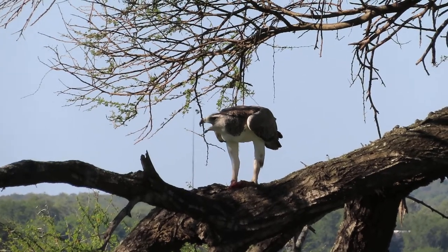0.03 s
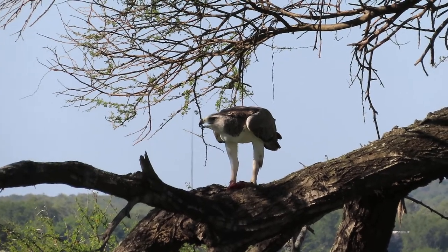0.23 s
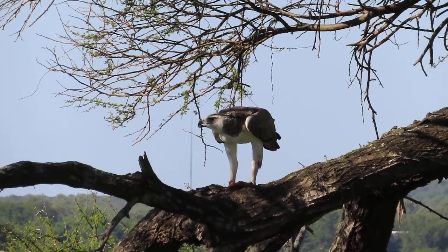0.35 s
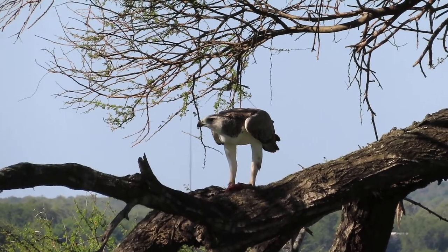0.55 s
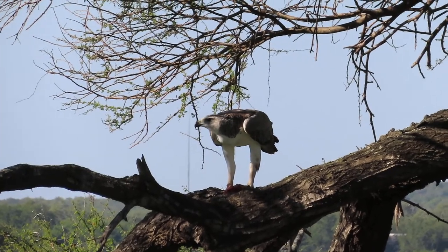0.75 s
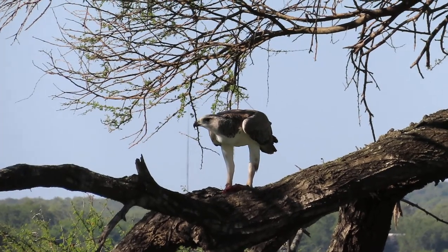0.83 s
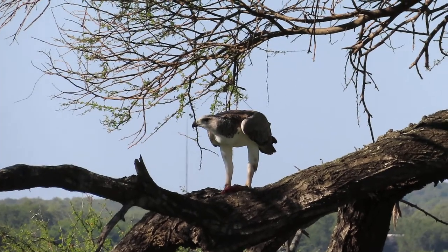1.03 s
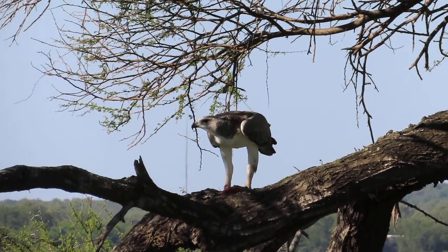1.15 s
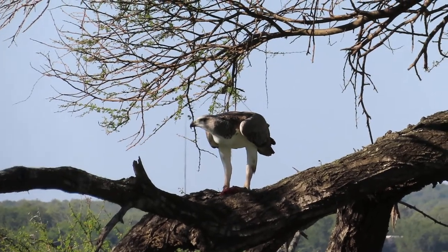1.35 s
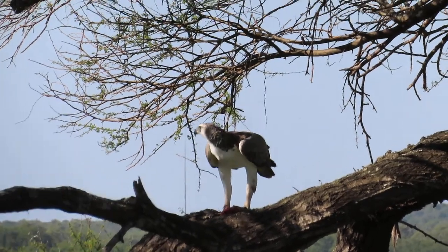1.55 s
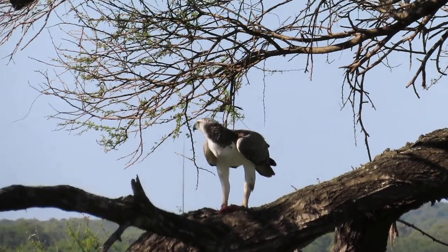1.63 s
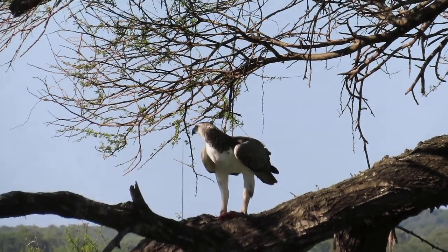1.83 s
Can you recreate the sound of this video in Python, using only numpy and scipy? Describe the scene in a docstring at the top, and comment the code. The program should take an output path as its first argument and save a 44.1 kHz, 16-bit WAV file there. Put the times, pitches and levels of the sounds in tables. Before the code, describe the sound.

An eagle gives one short, clear yelp nearby, with faint small birds far off.

```python
"""Eagle yelping among trees

Close by, almost straight ahead of a stereo microphone, an eagle on a bough gives a short, clear yelp
that arches in pitch and breaks into a higher register at the top. The yelp before it is just dying
away; both scatter back from the surrounding trees. Far off a small bird holds a thin whistle and
others chirp, over soft outdoor air and a faint low drone."""
import sys
import numpy as np
from scipy import signal
from scipy.io import wavfile
from scipy.ndimage import uniform_filter1d

SR = 44100
rng = np.random.default_rng(int(sys.argv[2]) if len(sys.argv) > 2 else 0)


def persist_wave(psi):
    """Save psi, clipped to +-1, as 16-bit WAV."""
    counts = np.round(np.clip(psi, -1, 1) * 32767).astype(np.int16)
    wavfile.write(sys.argv[1], SR, np.atleast_2d(counts).T)


N = 83790


def from_db(db):
    """Decibels to gain."""
    return 10 ** (np.asarray(db) / 20)


def unit_rms(x):
    """Scale to an rms of 1."""
    return x / np.sqrt(np.mean(x ** 2) + 1e-20)


def at_times(rows, t):
    """Each column of a curve at the times t."""
    seconds, *columns = np.transpose(rows)
    return [np.interp(t, np.sort(seconds), column) for column in columns]


def at_hz(points, hz):
    """Read a spectrum on a log-frequency axis."""
    freqs, values = np.transpose(points)
    return np.interp(np.log(hz), np.log(freqs), values)


def drift(rate_hz, size=N):
    """Smooth random wandering with an rms of 1."""
    pole = np.exp(-2 * np.pi * rate_hz / SR)
    smooth = signal.lfilter([1], [1, -2 * pole, pole * pole], rng.standard_normal(size + SR))
    return unit_rms(smooth[SR:])


def phase_of(hz):
    """Running phase of a changing pitch."""
    return 2 * np.pi * np.cumsum(hz) / SR


def delayed(x, seconds):
    """The same sound later, or earlier for a negative delay."""
    i = np.arange(len(x))
    return np.interp(i - seconds * SR, i, x, left=0)


def pan(left_db):
    """Channel gains that put the left left_db above the right."""
    return from_db([[left_db / 2], [-left_db / 2]])


def scatter(x, t60_s, cut_hz):
    """Countless small, dull echoes that die away, different on each side of the microphone."""
    t = np.arange(SR) / SR
    build_up = 1 - np.exp(-t / .01)
    echoes = rng.standard_normal((2, SR)) * from_db(-60 * t / t60_s) * build_up
    echoes /= np.sqrt(np.sum(echoes ** 2, axis=1, keepdims=True))
    dull = signal.sosfilt(signal.butter(2, cut_hz, fs=SR, output="sos"), x)
    return signal.fftconvolve(dull[None], echoes, axes=1)[:, :len(x)]


# The air all round the microphone. Each row: frequency in Hz, relative spectral density in dB.
AIR_SPECTRUM = [(15, -40), (25, -6), (36, -14), (55, 4), (79, -5), (104, -1.5), (253, -3), (289, -14.5),
                (469, -2), (536, -12.5), (825, -12.5), (3720, -26.5), (4030, -27.5), (4490, -25.5),
                (15500, -47.5)]
# How alike it is left and right. Each row: frequency in Hz, correlation.
AIR_LIKENESS = [(40, 1), (90, 0.95), (180, 0.55), (350, -0.36), (700, 0.038), (1500, 0.033), (4000, 0.32),
                (12000, 0.25)]


def air(level_db=-46, flicker_db=0.67):
    """Soft outdoor noise in half-octave bands, alike on both sides only in the bass."""
    edges = 20 * 2 ** np.arange(0, 10.1, .5)
    bands, white = 0, rng.standard_normal((2, 2, N + SR // 4))
    for k, (low, high) in enumerate(zip(edges, edges[1:])):
        bandpass = signal.butter(2, [low, high], "band", fs=SR, output="sos")
        mid, side = signal.sosfilt(bandpass, white[k % 2])[:, -N:]
        centre_hz = np.sqrt(low * high)
        alike = at_hz(AIR_LIKENESS, centre_hz)
        width = np.sqrt((1 - alike) / (1 + alike))
        gain = from_db(at_hz(AIR_SPECTRUM, centre_hz) + flicker_db * drift(10.2))
        bands += gain * (mid + width * side * [[1], [-1]])
    return from_db(level_db) * unit_rms(bands)


# A drone in the background, dead centre. Each row: frequency in Hz, rms level in dB.
DRONE_TONES = [(53.8, -55.5), (107.7, -60), (257, -62), (473.7, -62.5), (850.6, -66)]


def drone(waver=0.012):
    """A few faint, slightly wavering low tones."""
    return sum(np.sqrt(2) * from_db(db) * np.sin(phase_of(hz * (1 + waver * drift(24))))
               for hz, db in DRONE_TONES)


# One small bird, far from the microphone. Each row: time in seconds, pitch in Hz, level in dB.
WHISTLE_CURVE = [(.615, 4200, -78), (.637, 4090, -59), (.68, 4030, -69), (.73, 4030, -63), (.76, 4100, -72),
                 (.83, 4160, -60), (.87, 4075, -52), (.905, 4150, -56), (1.02, 4050, -64),
                 (1.05, 4080, -55), (1.09, 4000, -61), (1.16, 3980, -62), (1.178, 3990, -53),
                 (1.205, 4000, -60), (1.245, 4070, -59), (1.278, 4310, -58), (1.31, 4310, -72)]


def whistle(t, waver=.003, flutter_db=3):
    """One long, thin tone that wavers in pitch and flutters in level."""
    hz, db = at_times(WHISTLE_CURVE, t)
    sounding = (t > WHISTLE_CURVE[0][0]) & (t < WHISTLE_CURVE[-1][0])
    gain = sounding * from_db(db + flutter_db * drift(35))
    return gain * np.sin(phase_of(hz * (1 + waver * drift(60))))


# Other birds, just as far off. Each row: start in seconds, length in seconds, pitch in Hz,
# glide in Hz, level in dB.
FAR_CHIRPS = [(0.118, 0.13, 5050, -52.5, -68.5), (.445, 0.031, 4850, -120, -71),
              (.498, 0.028, 4760, -120, -65), (0.667, 0.19, 3150, -80, -70.5),
              (0.914, 0.025, 4940, -30, -65), (1.187, 0.031, 5065, -80, -68), (1.217, .035, 5050, -80, -65),
              (1.569, 0.017, 5000, -80, -66), (1.605, .025, 5060, -130, -63),
              (1.646, 0.019, 5080, -150, -60), (1.83, 0.042, 2800, -20, -65)]


def chirps(t, waver=0.0074):
    """Short, soft tones that swell and fade as they slip down in pitch."""
    song = 0
    for start, length, pitch_hz, glide_hz, level_db in FAR_CHIRPS:
        progress = np.clip((t - start) / length, 0, 1)
        hz = (pitch_hz + glide_hz * progress) * (1 + waver * drift(134))
        song += from_db(level_db) * np.sin(np.pi * progress) * np.sin(phase_of(hz))
    return song


def small_birds():
    """Whistle and chirps a little to the left, blurred by distance and echoed by the tree line."""
    t = np.arange(N) / SR
    song = whistle(t) + chirps(t)
    tree_line = from_db(-13) * delayed(song, seconds=.115)
    blur = from_db(-9) * scatter(song, t60_s=.45, cut_hz=7700)
    return np.sqrt(2) * ((song + tree_line) * pan(left_db=2) + blur)


# One yelp as it leaves the bird. Each row: seconds from its start, pitch in Hz, effort in dB.
YELP_CURVE = [(0, 1690, -30), (.0035, 1613, -13.5), (.0055, 1596, -17.5), (.0072, 1278, -4.5),
              (.010, 1307, -4), (0.0188, 1363, -6.5), (.022, 1385, -0.5), (0.029, 1463, -4),
              (0.045, 1521, 1), (0.046, 1573, -4), (0.0479, 1688, -1.5), (0.051, 1674, -1),
              (0.065, 1666, 1.5), (.075, 1626, -2.5), (.080, 1509, -4.5), (0.092, 1402, 3.5),
              (0.096, 1332, -12.5), (.104, 1270, -8.5), (0.114, 1210, -16.5), (0.121, 1126, -25)]
# Tone colour of the yelp, with a thin, high overtone near 8350 Hz at the loudest part.
# Each row: frequency in Hz, gain in dB.
YELP_COLOUR = [(1100, 0), (1330, -20.5), (1420, -14), (1470, -7.5), (1510, -0.5), (1680, -0.5), (2100, -34),
               (2550, -20.5), (2950, -14.5), (3120, -14), (3230, -29), (3350, -16.5), (3820, -23.5),
               (4100, -46), (4350, -31), (4720, -52.5), (5050, -38), (5450, -61), (5900, -43.5),
               (6350, -63.5), (6700, -49), (7100, -68), (8000, -66), (8350, -42), (8700, -70)]


def yelp(t, jitter=0.0032, shimmer_db=0.7, rasp_db=-36, rasp_width_hz=62, fade_s=.002):
    """Harmonics of the syrinx sweep through the fixed peaks and dips of the tone colour."""
    hz, effort_db = at_times(YELP_CURVE, t)
    inertia = int(.002 * SR)   # jumps in pitch and level are smoothed over 2 ms
    hz = uniform_filter1d(hz, inertia) * (1 + jitter * drift(140, len(t)))
    phase, voice = phase_of(hz), 0
    for k in range(1, 6):
        # rasp is a noisy skirt round each harmonic
        rasp = drift(rasp_width_hz, len(t)) + 1j * drift(rasp_width_hz, len(t))
        harmonic = np.imag(np.exp(1j * k * phase) * (1 + k * from_db(rasp_db) * rasp))
        gain = from_db(effort_db + at_hz(YELP_COLOUR, k * hz))
        voice += uniform_filter1d(gain, inertia) * harmonic
    sounding = np.clip(np.minimum(t, YELP_CURVE[-1][0] - t) / fade_s, 0, 1)
    return voice * sounding * from_db(shimmer_db * drift(103, len(t)))


# Yelps from the bough. Each row: start in seconds, level in dB, extra level into the trees in dB.
EAGLE_CALLS = [(-.107, -13, 6.5), (.202, -13, 4)]
# Boughs and ground reflecting toward the microphone. Each row: delay in seconds, gain in dB.
NEAR_ECHOES = [(.0055, -16), (0.028, -24), (.052, -31.5), (.086, -33.5), (0.12, -43.5)]


def eagle():
    """The yelps, close and nearly straight ahead, with echoes from nearby leaves and farther trees."""
    lead_in = int(.2 * SR)   # room for the yelp that starts before time zero
    t = np.arange(-lead_in, N) / SR
    voice, into_trees = 0, 0
    for start, level_db, trees_db in EAGLE_CALLS:
        call = from_db(level_db) * yelp(t - start)
        voice += call
        into_trees += from_db(trees_db) * call
    bounces = sum(from_db(db) * delayed(into_trees, seconds) for seconds, db in NEAR_ECHOES)
    near = voice + signal.sosfilt(signal.butter(1, 4400, fs=SR, output="sos"), bounces)
    right = delayed(near, seconds=-9.9e-6)   # reaches the right side a hair sooner
    at_microphone = np.array([near, right]) * pan(left_db=-0.3)
    leaves = from_db(-21.5) * scatter(into_trees, t60_s=0.11, cut_hz=5900)
    woods = from_db(-31.5) * scatter(into_trees, t60_s=0.89, cut_hz=1500)
    return (at_microphone + leaves + woods)[:, lead_in:]


def scene():
    """All that reaches the microphone: eagle in front, small birds far off, drone and air behind."""
    return eagle() + small_birds() + drone() + air()


def record(dry, cutoff_hz=15200):
    """The top of the treble is cut steeply."""
    return signal.sosfilt(signal.ellip(10, .1, 80, cutoff_hz, fs=SR, output="sos"), dry)


dry = scene()
out = record(dry)
persist_wave(out)
```